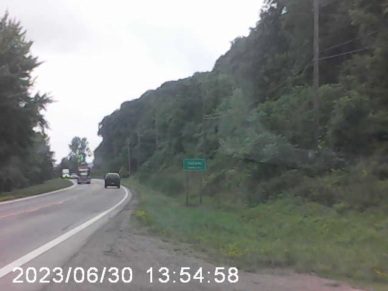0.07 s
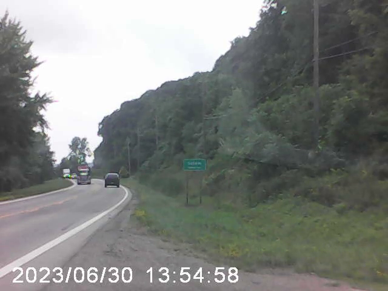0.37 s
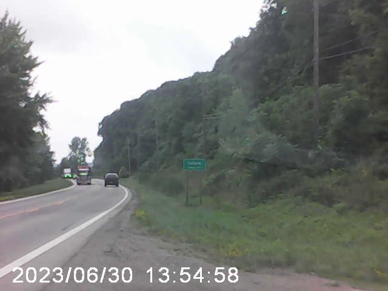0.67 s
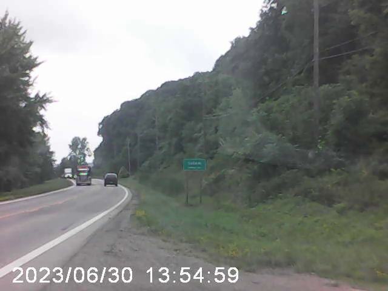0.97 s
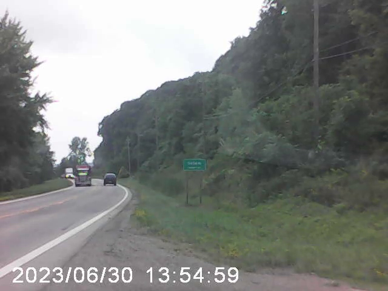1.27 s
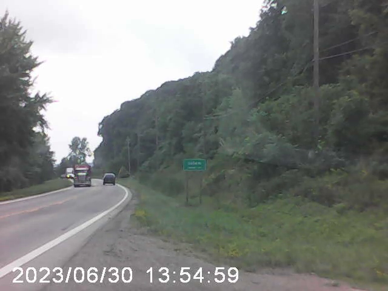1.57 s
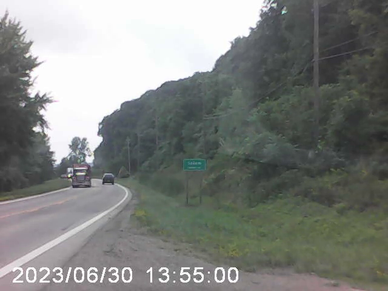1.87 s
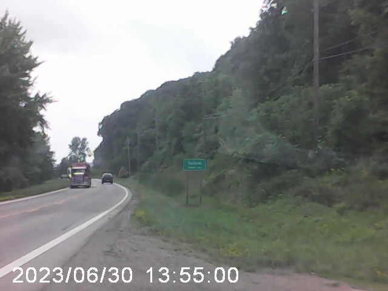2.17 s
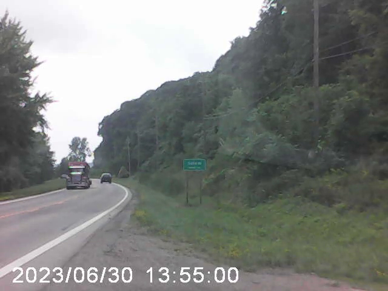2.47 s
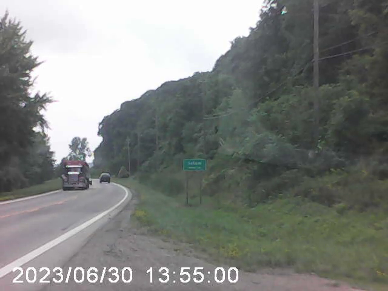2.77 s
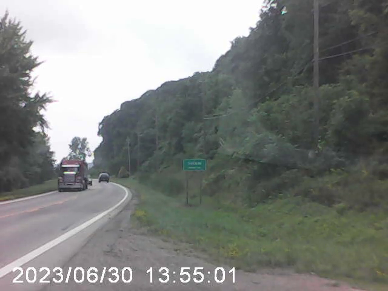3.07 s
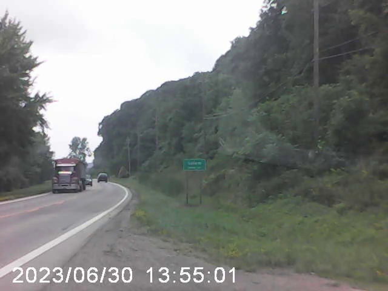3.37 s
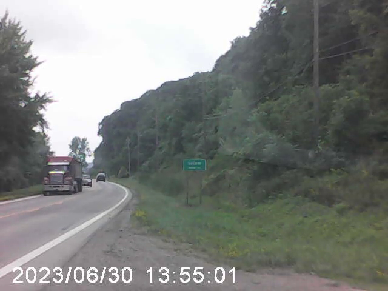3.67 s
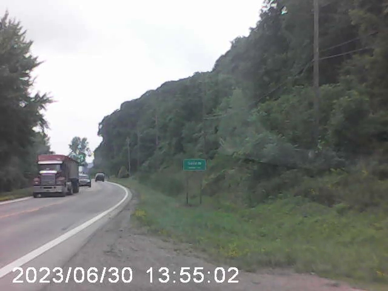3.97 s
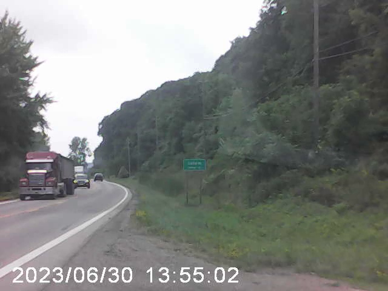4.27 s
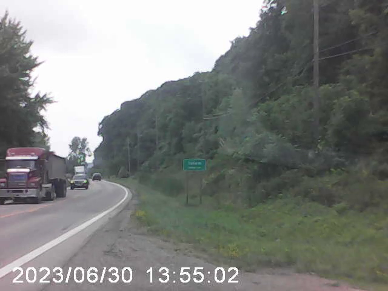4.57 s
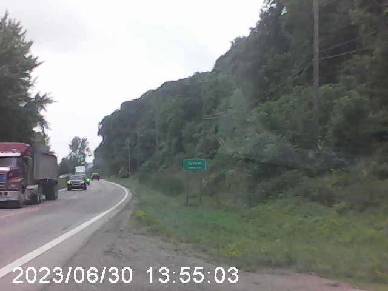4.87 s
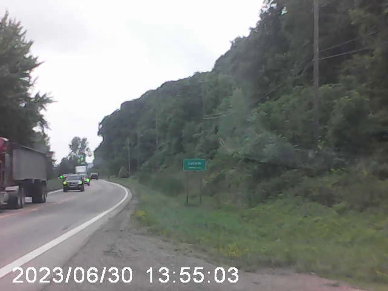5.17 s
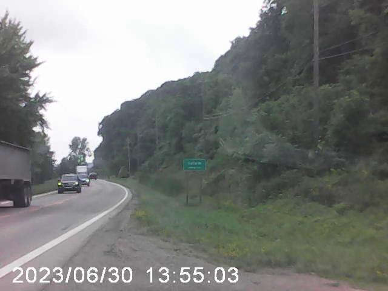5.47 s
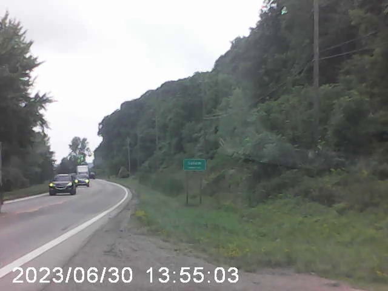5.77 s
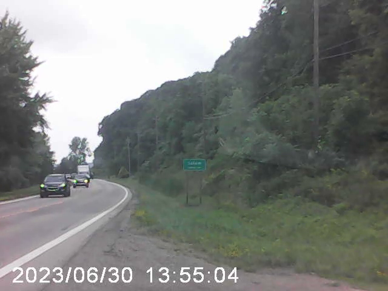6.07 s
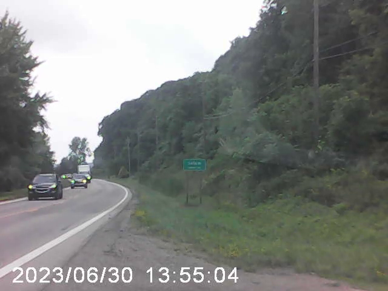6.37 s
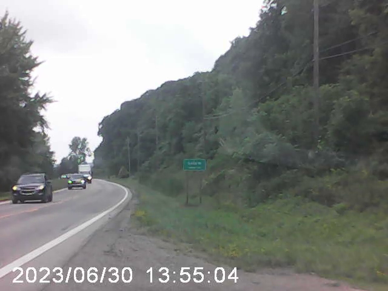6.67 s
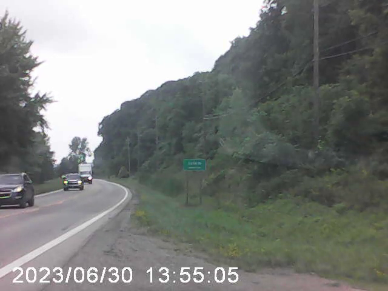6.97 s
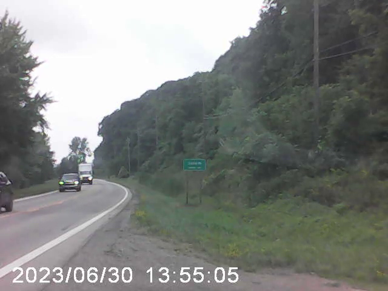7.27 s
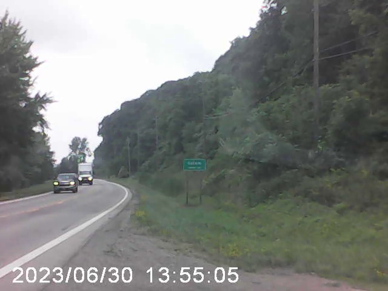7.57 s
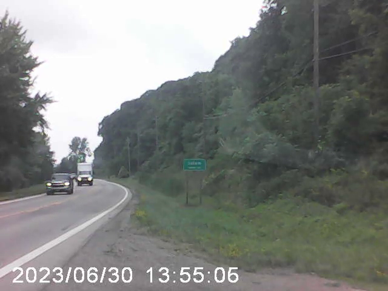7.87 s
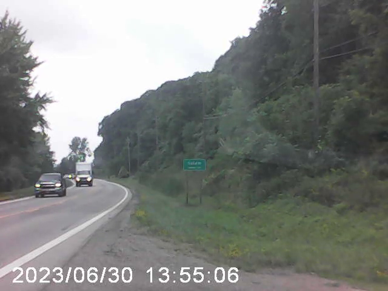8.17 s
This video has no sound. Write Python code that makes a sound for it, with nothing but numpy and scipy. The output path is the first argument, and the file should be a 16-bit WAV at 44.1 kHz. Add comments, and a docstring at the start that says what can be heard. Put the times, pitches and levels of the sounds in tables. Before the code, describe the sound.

A car idles with a light ticking while a heavy diesel truck approaches and roars past on the road.

```python
"""Truck passing an idling car

Roadside, heard through a small camera inside the car. Four cylinders throb; a valve ticks under the bonnet.
A diesel truck drones closer and passes in the far lane at about 7 s. Its tyres roar and sing, falling in
pitch (Doppler); its wake buffets the car and its exhaust booms behind it."""
import sys
import numpy as np
from scipy import signal
from scipy.fft import rfft, irfft, next_fast_len
from scipy.io import wavfile
from scipy.ndimage import uniform_filter1d, map_coordinates

SR = 44100
rng = np.random.default_rng(int(sys.argv[2]) if len(sys.argv) > 2 else 0)


def inscribe(sig):
    """Save sig as 16-bit PCM at rate SR to the path in sys.argv[1].

    A 1-D sig is mono; a 2-D sig holds one channel per row.
    Samples are clipped to [-1, 1] before scaling.
    """
    pcm = np.round(np.clip(np.atleast_2d(sig).T, -1, 1) * 32767)
    wavfile.write(sys.argv[1], SR, pcm.astype(np.int16))


N = 362502
TIME_S = np.arange(N) / SR

FIRING_HZ, VALVE_PER_S = 23.06, 14.2  # car
CYCLE_HZ, HUM_HZ, TRAILER_HZ = 11.76, 470, 1177  # truck at source: four-stroke cycle, tread hum, tyre whine
MACH, LANE_S = .08, .3  # truck speed / sound speed; lane distance / truck speed

# car idle (multiple of firing rate, level [dB])
IDLE_ORDERS = [(1, -43.5), (2, -43.5), (3, -59.5), (5, -52)]
# idle throb (time [s], gain [dB])
THROB_CURVE = [(0, -0.5), (1.9, 0), (2.5, -1.5), (3.5, -0.5), (4.3, -0.5), (8.22, -1.5)]
# fan and pumps (frequency [Hz], level [dB])
FAN_TONES = [(576.4, -56.5), (1453, -67.5), (1800, -77)]
# valve ring (frequency [Hz], level [dB], t60 [s])
VALVE_MODES = [(96.5, -47, 0.26), (297.9, -49, 0.28), (5340, -49.5, 0.028)]

# diesel, six firings a cycle (multiple of cycle rate, relative level [dB])
BLOCK_ORDERS = [(8, -4.5), (9, -3.5), (10, -9.5), (12, 2), (14, 0), (15, -18), (18, -12)]
GEAR_ORDERS = [(30, 0), (72, -10.5)]
EXHAUST_ORDERS = [(5, -17), (6, 6.5), (12, -5.5), (14, -9.5), (17, -11), (18, -16.5), (21, -14.5)]
# diesel load on approach; exhaust opening up behind the cab (time [s], gain [dB])
LOAD_CURVE = [(0, -8), (1.5, -4), (3.2, -2.5), (4.6, 0.5), (5.0, -3.5), (6.2, -10.5)]
EXHAUST_CURVE = [(0, -71), (5.2, -50), (6.8, -42), (7.15, -35), (8.22, -28.5)]
# tyres of a distant, departing car (time [s], gain [dB])
LEAVING_CAR_CURVE = [(0, -65.5), (3, -71.5)]
# axle groups, relative levels (time abreast [s], sideways roar [dB], sideways hiss [dB],
# sideways howl [dB], tread tone along the road [dB], howl pitch [Hz])
AXLE_GROUPS = [(6.8, -32.5, -42.5, -26.5, -17.5, 1001), (7.11, -27.5, -37.5, -20, -31, 864.7),
               (7.369, -31.5, -49.5, -29.5, -22.5, 854), (7.532, -43, -41, -47.5, -34, 843)]
# cabin resonances driven by the roar (frequency [Hz], width [Hz], relative level [dB])
PANEL_MODES = [(626, 64, -3.5), (1622, 91, -13.5), (2105, 81, -26), (2435, 80, -25.5)]

# noise spectra (frequency [Hz], relative density [dB])
MURMUR_SPECTRUM = [(6, -13), (19, 3), (33, -4), (60, -2.5), (85, -10), (120, -9), (160, -19.5), (215, -43),
                   (300, -14.5), (520, -19.5), (620, -17.5), (740, -22), (1000, -23), (1500, -28.5),
                   (2000, -39), (4000, -58)]
AIR_SPECTRUM = [(20, -14.5), (55, 2), (92, -12.5), (125, 1), (195, 6), (240, 2.5), (275, 2.5), (320, -8.5),
                (365, -14.5), (600, -1.5), (1200, -61)]
ROAR_SPECTRUM = [(200, -21), (290, -8), (340, -3), (390, -4), (520, -6.5), (590, 0), (650, -3.5),
                 (715, -5.5), (790, -3), (900, 2.5), (1040, -8), (1250, -8.5), (2500, -62)]
SLAP_SPECTRUM = [(700, -35), (1100, -13.5), (1270, 6.5), (1400, 5.5), (1490, 2.5), (1600, 3.5), (1770, 4),
                 (1950, -7.5), (2300, -35.5), (4000, -59.5)]
HISS_SPECTRUM = [(1400, -32.5), (1950, 3), (2085, -0.5), (2220, 4), (2390, 3.5), (2560, 0), (2720, 1),
                 (3050, 3), (3250, -1.5), (3600, -11.5), (4500, -27), (8800, -50)]
BUFFET_SPECTRUM = [(5, -3.5), (15, 0), (45, 11), (85, -19), (200, -61)]
FIZZ_SPECTRUM = [(3000, -34.5), (3700, -7.5), (3950, 2), (4100, -2.5), (4400, -11.5), (5400, -12.5),
                 (6500, -18.5), (7300, -14.5), (8800, -40.5)]
CAMERA_SPECTRUM = [(800, -9), (2000, 2.5), (3500, 3), (4400, 2), (6500, 2), (7400, 2.5), (8000, -3.5),
                   (8500, -14), (8900, -46)]
# camera electronics (frequency [Hz], level [dB])
CAMERA_WHISTLES = [(3817, -85), (4366, -78), (5819, -75), (7273, -78)]


def amp(db):
    """Decibels to gain."""
    return 10 ** (np.asarray(db) / 20)


def unit(x):
    """Scale to rms 1."""
    return x / np.sqrt(np.mean(x ** 2) + 1e-20)


def level(points):
    """Gain curve through (time [s], level [dB])."""
    return amp(np.interp(TIME_S, *np.transpose(points)))


def noise(spectrum):
    """Shaped noise, rms 1."""
    hz, db = np.transpose(spectrum)
    size = next_fast_len(N)
    bins_hz = np.fft.rfftfreq(size, 1 / SR)
    gain = amp(np.interp(np.log(bins_hz + 1), np.log(hz + 1), db))
    return unit(irfft(rfft(rng.standard_normal(size)) * gain, size)[:N])


def drift(max_hz):
    """Smooth random wander, rms 1."""
    hz = np.geomspace(max_hz / 10, max_hz, 20)[:, None]
    coarse_s = TIME_S[::64]
    waves = np.sin(2 * np.pi * (hz * coarse_s + rng.random(hz.shape))) / np.sqrt(hz)
    return np.interp(TIME_S, coarse_s, unit(waves.sum(0)))


def tones(turns, rows):
    """Sines on whole multiples of a rotation; rows are (multiple, rms level [dB])."""
    sines = (amp(db) * np.sin(2 * np.pi * (round(k) * turns + rng.random())) for k, db in rows)
    return np.sqrt(2) * sum(sines)


def sing(hz, width_hz):
    """Narrow noise band on a fixed pitch or pitch curve, rms 1."""
    hop = 8
    pole = np.exp(-np.pi * width_hz * hop / SR)
    baseband = signal.lfilter([1], [1, -2 * pole, pole * pole], rng.standard_normal((2, N // hop + 1)))
    baseband /= np.sqrt(uniform_filter1d((baseband ** 2).sum(0), SR // hop // 10))  # steady power
    real, imag = uniform_filter1d(np.repeat(baseband, hop, axis=1), hop)[:, :N]
    turns = np.cumsum(np.broadcast_to(hz, N)) / SR
    phase = (2 * np.pi * (turns % 1)).astype(np.float32)
    return unit(real * np.cos(phase) + imag * np.sin(phase))


def doppler(abreast_s):
    """Pitch factor of a truck part that is nearest at abreast_s."""
    along_s = TIME_S - abreast_s
    return 1 / (1 + MACH * along_s / np.hypot(along_s, LANE_S))


def resample(x, speed):
    """Play x at a varying speed."""
    return map_coordinates(x, [np.cumsum(speed)], order=1, mode="mirror")


def passing(from_s, to_s, db, ahead_db, behind_db):
    """Pass-by gain: db while alongside, less ahead_db or behind_db per doubling of distance."""
    along_s = TIME_S - np.clip(TIME_S, from_s, to_s)
    doublings = np.log2(np.hypot(along_s, LANE_S) / LANE_S)
    return amp(db - doublings * np.where(along_s < 0, ahead_db, behind_db))


def beam(abreast_s, width_s):
    """Gain of a sideways beam sweeping past."""
    return np.exp(-.5 * ((TIME_S - abreast_s) / width_s) ** 2)


def horn(abreast_s, ahead_db, behind_db):
    """Gain of the tyre-road wedge: radiates fore and aft, null abreast."""
    along_s = TIME_S - abreast_s
    directivity = along_s ** 2 / (along_s ** 2 + LANE_S ** 2)
    return directivity * passing(abreast_s, abreast_s, 0, ahead_db, behind_db)


def axle_flare():
    """Gain of the hiss as each axle goes by."""
    return np.sqrt(sum((amp(db) * beam(s, width_s=0.13)) ** 2 for s, _, db, *_ in AXLE_GROUPS))


def idling_car():
    """Four cylinders throb; fan and pumps whine over a steady murmur."""
    turns = np.cumsum(FIRING_HZ * (1 + 0.0053 * drift(2.0))) / SR
    throb = level(THROB_CURVE) * tones(turns, IDLE_ORDERS) * (1 + 0.09 * drift(5))
    fan_clock_s = np.cumsum(1 + 0.00075 * drift(3)) / SR
    return throb + tones(fan_clock_s, FAN_TONES) + amp(-45.5) * noise(MURMUR_SPECTRUM)


def valve():
    """A solenoid valve thuds and pings at a steady rate; some strokes seat softly."""
    stroke_s = np.arange(.008, TIME_S[-1], 1 / VALVE_PER_S)
    spread, chance = rng.random((len(stroke_s), 2)).T
    strokes = np.zeros(N)
    strokes[(stroke_s * SR).astype(int)] = (0.73 + .3 * spread) * np.where(chance < .22, .4, 1)
    t = TIME_S[:SR // 4]
    ring = sum(amp(db - 60 * t / t60_s) * np.sin(2 * np.pi * hz * t) for hz, db, t60_s in VALVE_MODES)
    attack = 1 - np.exp(-t / 0.0014)
    return signal.oaconvolve(strokes, ring * attack)[:N]


def diesel():
    """Six cylinders: block and gears drone on approach and flare at the cab; the exhaust booms behind."""
    turns = np.cumsum(CYCLE_HZ * doppler(6.75) * (1 + 0.0014 * drift(4.5))) / SR
    load = level(LOAD_CURVE)
    cab = passing(from_s=6.88, to_s=6.92, db=-42, ahead_db=25, behind_db=9)
    drone = sum(tones(turns, [order]) * (1 + 0.23 * drift(12)) for order in BLOCK_ORDERS)
    whine = tones(turns, GEAR_ORDERS) * (1 + 0.19 * drift(25))
    boom = tones(turns, EXHAUST_ORDERS) * (1 + 0.16 * drift(15))
    block = (amp(-47.5) * load + cab) * unit(drone)
    gears = (amp(-54) * load ** 1.7 + amp(-28.5) * beam(6.88, width_s=0.043)) * unit(whine)
    intake = amp(-67) * load ** 4 * noise(HISS_SPECTRUM)  # heard near full load
    intake += amp(-59) * load ** 6 * sing(915, width_hz=50)
    return block + gears + intake + level(EXHAUST_CURVE) * unit(boom)


def road_noise():
    """Air tumbles round the trailer; tyres roar, slap and hiss on asphalt; cabin panels ring."""
    air_gain = passing(from_s=6.94, to_s=7.41, db=-27, ahead_db=15.5, behind_db=11)
    air_gain = np.hypot(air_gain, amp(-57))  # far traffic
    roar_gain = passing(from_s=6.776, to_s=7.185, db=-29, ahead_db=9.5, behind_db=9)
    roar_gain = np.hypot(roar_gain, sum(amp(db) * beam(s, width_s=0.058) for s, db, *_ in AXLE_GROUPS))
    slap_gain = passing(from_s=7.08, to_s=7.28, db=-35, ahead_db=9, behind_db=7)
    hiss_gain = passing(from_s=7.0, to_s=7.48, db=-43.8, ahead_db=8.4, behind_db=7)
    flutter = drift(45)  # uneven road
    air = air_gain * noise(AIR_SPECTRUM) * amp(1.3 * drift(13))
    roar = roar_gain * resample(noise(ROAR_SPECTRUM), doppler(6.95)) * amp(1.46 + 0.8 * flutter)
    panels = roar_gain * sum(amp(db) * sing(hz, width_hz) for hz, width_hz, db in PANEL_MODES)
    slap = np.hypot(slap_gain, level(LEAVING_CAR_CURVE)) * noise(SLAP_SPECTRUM)
    hiss = np.hypot(hiss_gain, axle_flare()) * noise(HISS_SPECTRUM)
    return air + roar + panels + (slap + hiss) * amp(0.65 * flutter)


def wake():
    """The truck's wake buffets the car; the cabin booms and fine hiss leaks in, both at fixed pitch."""
    buffet_gain = passing(from_s=6.06, to_s=6.9, db=-37.5, ahead_db=7.5, behind_db=1.8)
    boom_gain = passing(from_s=7.26, to_s=7.16, db=-33, ahead_db=5.6, behind_db=18)
    fizz_gain = passing(from_s=6.66, to_s=7.24, db=-57, ahead_db=6.5, behind_db=1.5)
    fizz_gain = np.hypot(fizz_gain, amp(-9) * axle_flare())
    buffet = buffet_gain * noise(BUFFET_SPECTRUM)
    boom = boom_gain * sing(121, width_hz=28)
    fizz = fizz_gain * noise(FIZZ_SPECTRUM) * amp(0.65 * drift(30))
    return buffet + boom + fizz


def tread_tones(pair_split=.042):
    """Tread blocks strike the road and sing; paired tyres howl on two close pitches, falling on passing."""
    howl, hum_power = 0, 0
    for abreast_s, _, _, side_db, along_db, source_hz in AXLE_GROUPS:
        hz = source_hz * doppler(abreast_s)
        upper = sing(hz * (1 + pair_split), width_hz=39)
        lower = sing(hz * (1 - pair_split), width_hz=58)
        sideways = amp(side_db) * beam(abreast_s, width_s=0.088)
        along_road = amp(along_db) * horn(abreast_s, ahead_db=18, behind_db=13)
        howl += unit(upper + lower) * np.hypot(sideways, amp(-2.3) * along_road)
        hum_power += along_road ** 2
    hum = amp(2 + 1.3 * drift(8)) * np.sqrt(hum_power) * sing(HUM_HZ * doppler(6.83), width_hz=33.6)
    trailer_gain = passing(from_s=7.15, to_s=7.57, db=-35.5, ahead_db=17, behind_db=3.5)
    trailer = trailer_gain * sing(TRAILER_HZ * doppler(6.8), width_hz=84)
    whistle_gain = passing(from_s=6.53, to_s=7.9, db=-62.5, ahead_db=5, behind_db=8)
    whistle = whistle_gain * sing(4090, width_hz=140)
    return hum + howl + trailer + whistle


def scene():
    """Mono sum at the microphone."""
    return (idling_car() + valve() + diesel() + road_noise() + wake() + tread_tones())[None]


def record(dry):
    """The camera adds hiss and faint whistles, and cuts the treble."""
    wet = dry + amp(-60.5) * noise(CAMERA_SPECTRUM) + tones(TIME_S, CAMERA_WHISTLES)
    low_pass = signal.firwin(511, cutoff=8830, window=("kaiser", 9), fs=SR)
    return signal.oaconvolve(wet, low_pass[None], "same")


dry = scene()
out = record(dry)
inscribe(out)
```